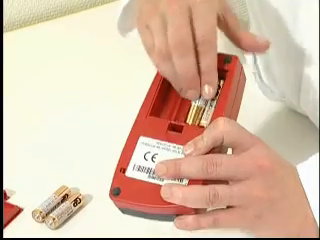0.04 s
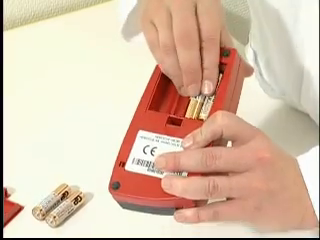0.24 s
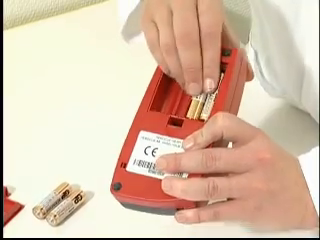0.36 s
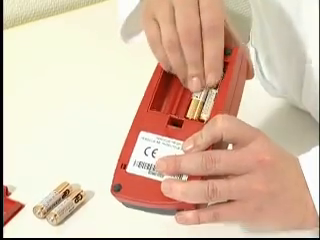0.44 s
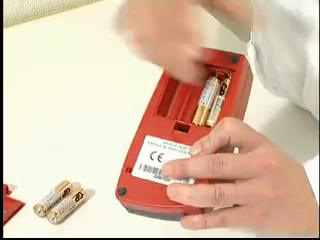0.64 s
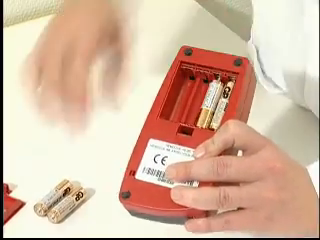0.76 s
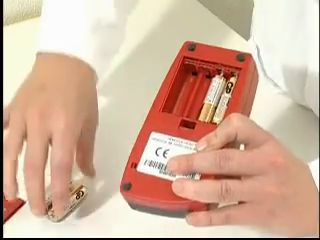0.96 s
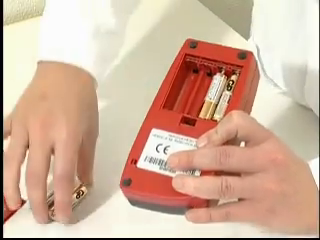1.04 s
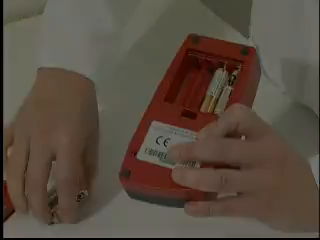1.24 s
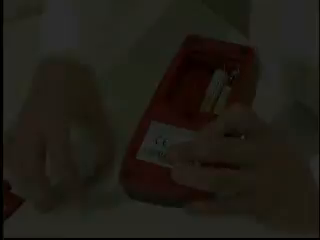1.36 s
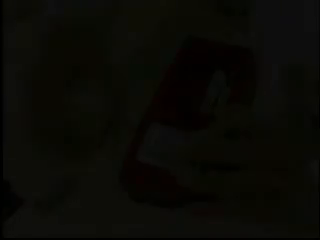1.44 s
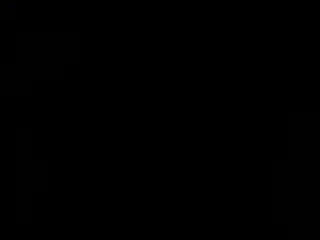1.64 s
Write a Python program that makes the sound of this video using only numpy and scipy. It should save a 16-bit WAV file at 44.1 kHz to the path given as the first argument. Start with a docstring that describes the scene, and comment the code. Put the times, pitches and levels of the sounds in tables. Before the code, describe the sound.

Two hard plastic clicks as a battery is pressed into a handheld device, soft table taps after

```python
"""A bare, quiet room with a table: a battery is pressed into the plastic compartment of a handheld device.
It shifts in its slot, snaps past the contact, then seats: shaped noise drives the resonances of the case.
The hand bumps dully on the table and touches the spare batteries; one deep, soft thump follows.
All but the thump gets a reverberant tail of decaying noise, whose level against the direct sound hints at distance.
Room noise, microphone hiss and faint electrical tones lie under it all."""
import sys
import numpy as np
from scipy import signal
from scipy.fft import rfft, irfft
from scipy.io import wavfile
from scipy.ndimage import uniform_filter1d

SR = 44100
rng = np.random.default_rng(int(sys.argv[2]) if len(sys.argv) > 2 else 0)


def bounce(signal):
    """Save signal as a 16-bit WAV file at the path given by the first command-line argument."""
    frames = np.transpose(np.atleast_2d(signal))
    limited = np.clip(frames, -1, 1)
    pcm = np.round(limited * 32767).astype(np.int16)
    wavfile.write(sys.argv[1], SR, pcm)


N = 74970
EVENT_TIME = np.arange(SR // 3) / SR  # clock of a single dry event, s

# Battery snaps, levels of the force on the case: (time [s], scrape level [dB], crack level [dB],
# crack T60 [s], rattle level [dB], rattle T60 [s], room level [dB])
SNAPS = [(.248, -35.5, -14.5, .014, -24, 0.082, -13), (.458, -47.5, -12, 0.018, -17.5, .056, -12)]
# Broad colour of the case, one list for each snap: (frequency [Hz], relative level [dB])
CRACK_COLOURS = [
    [(100, -35), (350, -32), (520, -17.5), (800, -17), (1000, -21), (1300, -9.5), (2500, -8.5),
     (3600, -6.5), (7800, -6), (8600, -19), (10000, -10.5), (11500, -17), (13000, -14), (16000, -22)],
    [(100, -37), (270, -16), (480, -14.5), (800, -8.5), (1150, -7.5), (1500, -6.5), (1850, -14.5),
     (2500, 1), (3300, -3.5), (7000, -7.5), (9900, -6.5), (10800, -16.5), (12500, -13), (16000, -34.5)],
]
# Resonances of case and battery: (frequency [Hz], T60 [s], relative peak in the first snap [dB],
# relative peak in the second snap [dB])
CASE_MODES = [(700, 0.13, -7.5, -9.5), (960, 0.077, -33.5, 0.5), (1230, .04, 2.5, -16.5),
              (1272, 0.12, -12, 1.5), (1446, 0.029, -1.5, 10), (1593, 0.054, -2.5, 10.5),
              (1953, .035, -0.5, -12.5), (2268, 0.024, -5.5, 9.5), (2365, 0.12, -6, -5),
              (2755, 0.06, -5.5, 3), (3040, 0.06, 2, -4.5), (3364, 0.036, 1, -7.5),
              (3820, 0.019, -1.5, 3.5), (4115, .03, 2, -6.5), (4518, .035, -6.5, 2),
              (5350, 0.015, 1.5, -12.5), (5523, 0.075, -6.5, 8), (6000, .03, 0, -4),
              (7050, 0.027, -10.5, 1.5), (7530, 0.012, 0.5, -10.5), (8960, 0.084, -27.5, -4.5),
              (10060, .013, 1, -21)]
SLIDE_S, SLIDE_T60_S = 0.008, 0.024  # the scrape swells for this long before the snap
CRACK_RISE_S, CRACK_HOLD_S = 0.0011, 0.0025

# Battery shifting in its slot: (time [s], level [dB], T60 [s])
NUDGES = [(.001, -60, 0.12), (0.027, -66, 0.097), (.058, -71, .08)]
NUDGE_ROOM_DB, NUDGE_DULL_HZ = -2, 2000

# Hand and arm on the table: (time [s], level [dB], T60 [s], table ring relative to that level [dB])
BUMPS = [(.88, -68.5, 0.26, 3), (.919, -54.5, 0.095, 7), (.936, -56, 0.21, -17), (.969, -57.5, 0.28, 10.5),
         (1.003, -60.5, 0.13, -2.5), (1.036, -58, 0.19, -1), (1.076, -63, 0.2, -10), (1.112, -67, 0.48, -5)]
# Broad colour of a bump: (frequency [Hz], relative level [dB])
BUMP_COLOUR = [(50, -31), (130, 6.5), (230, -0.5), (330, -10), (460, -10), (700, -7.5), (1500, -9),
               (3000, -20.5), (6000, -27.5), (12000, -38)]
# Resonances of the table top: (frequency [Hz], T60 [s], relative level [dB])
TABLE_MODES = [(220.7, 0.19, -11.5), (430, 0.14, -3.5), (497.6, 0.095, -5.5)]

# Fingers touching the spare batteries: (time [s], level [dB], T60 [s])
TOUCHES = [(1.221, -52.5, .12), (1.3, -70, 0.18), (1.672, -71, 0.17)]
# Broad colour of a touch: (frequency [Hz], relative level [dB])
TOUCH_COLOUR = [(100, -14), (300, 4), (550, 2.5), (830, 0), (1300, -4.5), (2200, -19.5), (5000, -44),
                (12000, -44)]
SOFT_RISE_S, BUMP_ROOM_DB, TOUCH_ROOM_DB = 0.0031, -1, -6

THUMP_S, THUMP_DB, THUMP_RISE_S, THUMP_T60_S = 1.663, -56, 0.0054, 0.5
# Broad colour of the thump: (frequency [Hz], relative level [dB])
THUMP_COLOUR = [(25, -5.5), (50, 7.5), (85, 4), (150, -17), (300, -13.5), (700, -35), (3000, -47)]

# Reverberation time of the room: (frequency [Hz], T60 [s])
ROOM_T60 = [(150, .55), (500, 0.46), (1000, .6), (1600, 0.5), (3000, 0.46), (5000, .43), (8000, .35),
            (12000, .26), (16000, .2)]
# Broad colour of the reverberation: (frequency [Hz], relative level [dB])
ROOM_COLOUR = [(150, -6), (300, -1.5), (600, 8), (1500, 0), (3000, 0.5), (5000, -2.5), (7000, -3.5),
               (10000, -8.5), (12000, -9), (16000, -11.5)]
# Gain of the left-right difference of the reverberation: (frequency [Hz], gain [dB])
ROOM_SIDE = [(150, -18.5), (600, -27), (1300, -20.5), (4000, -20.5), (10000, -17)]
ROOM_ONSET_S = 0.0086

# Still air and microphone hiss: (frequency [Hz], relative level [dB])
FLOOR = [(20, -2), (45, 1.5), (70, -4.5), (130, -4), (250, -11), (500, -19), (1000, -20), (2000, -24.5),
         (5000, -27), (10500, -29), (12500, -32), (16000, -40)]
FLOOR_DB, FLOOR_WIDTH = -70, 0.1  # mid rms level; side against mid as a plain ratio
# Steady electrical tones: (frequency [Hz], rms level [dB])
WHINE = [(100, -80.5), (900, -84.5), (998, -84), (11724, -87.5), (15625, -75)]
EDGE_HZ = 16200  # upper band limit of the recorder


def snaps():
    """A short scrape, a hard crack and a brief rattle set the case ringing."""
    out = np.zeros((2, N))
    t = EVENT_TIME
    after = np.maximum(t - SLIDE_S, 0)  # time since the snap
    rise = np.minimum(after / CRACK_RISE_S, 1)
    for k, (s, slide_db, crack_db, crack_t60, rattle_db, rattle_t60, room_db) in enumerate(SNAPS):
        # the scrape swells up to the snap and dies away after it
        slide = amp(slide_db) * decay(abs(SLIDE_S - t), SLIDE_T60_S) * rng.standard_normal(len(t))
        crack = amp(crack_db) * decay(np.maximum(after - CRACK_HOLD_S, 0), crack_t60)
        rattle = amp(rattle_db) * decay(after, rattle_t60)
        impact = burst(rise * np.hypot(crack, rattle))  # the two envelopes add in power
        add(out, s - SLIDE_S, in_room(case(slide + impact, index=k), room_db))
    return out


def nudges():
    """The battery rubs softly in its slot before it goes in: dulled noise drives the case."""
    out = np.zeros((2, N))
    b, a = signal.butter(1, NUDGE_DULL_HZ, fs=SR)
    for s, db, t60 in NUDGES:
        rub = soft_envelope(SOFT_RISE_S, t60) * rng.standard_normal(len(EVENT_TIME))
        force = signal.lfilter(b, a, rub)
        add(out, s, in_room(amp(db) * case(force, index=0), NUDGE_ROOM_DB))
    return out


def case(force, index):
    """The plastic case answers a force at the place of the first or second snap."""
    modes = [(hz, t60, peaks[index]) for hz, t60, *peaks in CASE_MODES]
    return colour(force, CRACK_COLOURS[index], modes)


def bumps():
    """Soft blows of hand and arm set the table top booming briefly."""
    out = np.zeros((2, N))
    rise = np.minimum(EVENT_TIME / SOFT_RISE_S, 1)
    for s, db, t60, ring_db in BUMPS:
        thud = colour(burst(soft_envelope(SOFT_RISE_S, t60)), BUMP_COLOUR)
        boom = amp(ring_db) * rise * ring(EVENT_TIME, TABLE_MODES)
        add(out, s, in_room(amp(db) * (thud + boom), BUMP_ROOM_DB))
    return out


def touches():
    """Light, dull finger taps: coloured noise bursts without resonances of their own."""
    out = np.zeros((2, N))
    for s, db, t60 in TOUCHES:
        tap = colour(burst(soft_envelope(SOFT_RISE_S, t60)), TOUCH_COLOUR)
        add(out, s, in_room(amp(db) * tap, TOUCH_ROOM_DB))
    return out


def thump():
    """One deep, soft noise burst with no resonances and no reverberation, alike in both channels."""
    out = np.zeros((2, N))
    blow = burst(soft_envelope(THUMP_RISE_S, THUMP_T60_S))
    add(out, THUMP_S, amp(THUMP_DB) * colour(blow, THUMP_COLOUR))
    return out


def in_room(x, room_db):
    """The direct sound in the centre plus its nearly mono reverberation."""
    level = amp(room_db)
    mid = level * signal.fftconvolve(x, room_tail())[:SR]
    side = level * signal.fftconvolve(x, room_tail())[:SR]
    add(mid, 0, x)
    side_gain = amp(read(ROOM_SIDE, np.fft.rfftfreq(SR, 1 / SR)))
    return spread(mid, irfft(rfft(side) * side_gain, SR))


def room_tail(size=256):
    """Dense reflections, of unit energy, that build up quickly; the highest treble dies first."""
    t = np.arange(SR) / SR
    hz, when, bands = signal.stft(rng.standard_normal(SR), SR, nperseg=size)
    bands = bands * decay(when, read(ROOM_T60, hz)[:, None])
    dying = signal.istft(bands, SR, nperseg=size)[1][:SR]
    even = irfft(flatten(rfft(dying), 60), SR) * (t < 0.8)
    tail = colour(even * np.minimum(t / ROOM_ONSET_S, 1) ** 2, ROOM_COLOUR)
    return tail / np.linalg.norm(tail)


def background():
    """Shaped noise for still air and microphone hiss, slightly wide, plus central steady sine tones."""
    t = np.arange(N) / SR
    gain = amp(read(FLOOR, np.fft.rfftfreq(N, 1 / SR)))
    mid, side = (unit(irfft(rfft(rng.standard_normal(N)) * gain, N)) for _ in range(2))
    whine = np.zeros(N)
    for hz, db in WHINE:
        whine += amp(db) * np.sqrt(2) * np.sin(2 * np.pi * (hz * t + rng.random()))
    return amp(FLOOR_DB) * spread(mid, FLOOR_WIDTH * side) + whine


def amp(db):
    """Decibels to gain."""
    return 10 ** (np.asarray(db) / 20)


def unit(x):
    """Scales to rms 1."""
    return x / np.sqrt(np.mean(x ** 2) + 1e-20)


def read(points, hz):
    """Reads a table on a log-frequency axis."""
    f, value = np.transpose(points)
    return np.interp(np.log(hz + 1), np.log(f + 1), value)


def add(mix, s, sound):
    """Adds a sound to the mix in place at time s, cut at the end of the mix."""
    part = mix[..., max(round(s * SR), 0):][..., :sound.shape[-1]]
    part += sound[..., :part.shape[-1]]


def decay(t, t60):
    """Falls 60 dB in t60 seconds."""
    return np.exp(-np.log(1000) * t / t60)


def soft_envelope(rise_s, t60):
    """A straight rise under an exponential decay."""
    return np.minimum(EVENT_TIME / rise_s, 1) * decay(EVENT_TIME, t60)


def colour(x, points, modes=(), size=8192):
    """Causal filter of unit energy: a broad spectrum plus resonances (frequency [Hz], T60 [s], peak [dB])."""
    hz = abs(np.fft.fftfreq(size, 1 / SR))
    power = amp(read(points, hz)) ** 2
    for centre, t60, db in modes:
        peak = (amp(db) * np.minimum(hz / centre, 1)) ** 2  # weaker below the resonance
        detune = 2 * np.pi * (hz - centre) * t60 / np.log(1000)
        power = power + peak / (1 + detune ** 2)
    # minimum phase: the filter answers as early as it can
    response = np.exp(np.conj(signal.hilbert(np.log(power) / 2)))
    taps = np.fft.ifft(response).real[:size // 2]
    return signal.fftconvolve(x, taps / np.linalg.norm(taps))[:len(x)]


def flatten(spectrum, size):
    """Evens out a spectrum by its local power, averaged over size bins."""
    return spectrum / np.sqrt(abs(uniform_filter1d(abs(spectrum) ** 2, size)) + 1e-20)


def burst(envelope, size=40, count=8):
    """Noise under an envelope, evened out so that it excites all frequencies alike."""
    x = rng.standard_normal(len(envelope))
    undo = envelope / (envelope ** 2 + (0.03 * envelope.max()) ** 2)  # bounded where the envelope is low
    for _ in range(count):
        x = irfft(flatten(rfft(x * envelope), size), len(x)) * undo
    return unit(x * envelope) * np.sqrt(np.mean(envelope ** 2))


def ring(t, modes):
    """Sum of dying sine modes (frequency [Hz], T60 [s], level [dB]) with random phases."""
    total = np.zeros(len(t))
    for hz, t60, db in modes:
        total += amp(db) * decay(t, t60) * np.sin(2 * np.pi * (hz * t + rng.random()))
    return total


def spread(mid, side):
    """Left and right from mid and side."""
    return np.array([mid + side, mid - side])


def scene():
    """All sources together."""
    return nudges() + snaps() + bumps() + touches() + thump() + background()


def record(dry):
    """The recorder's band limit: a steep low-pass on both channels."""
    taps = signal.firwin(511, EDGE_HZ, window=("kaiser", 9), fs=SR)
    return signal.oaconvolve(dry, taps[None], "same")


dry = scene()
out = record(dry)
bounce(out)
```